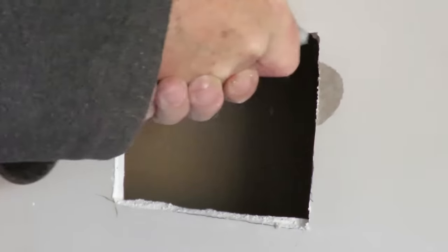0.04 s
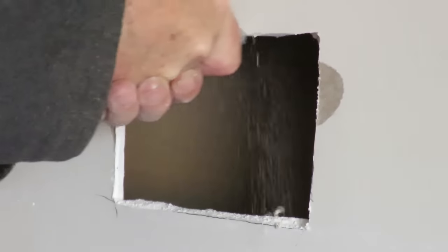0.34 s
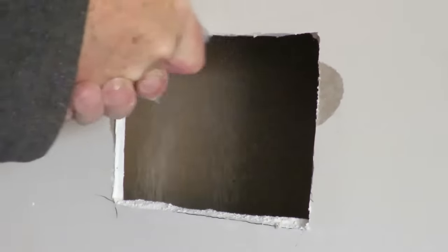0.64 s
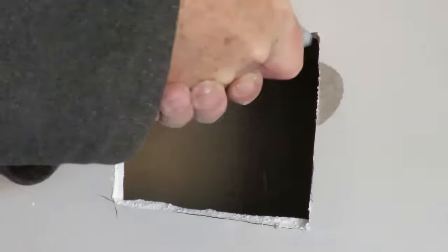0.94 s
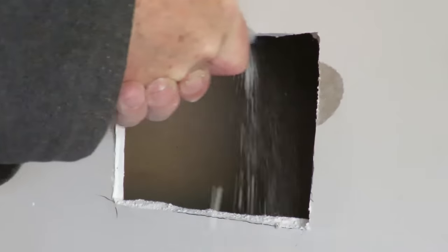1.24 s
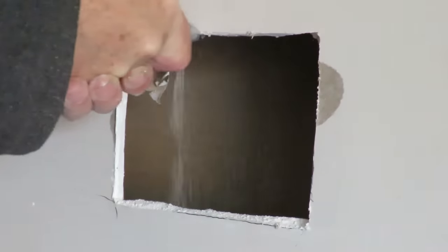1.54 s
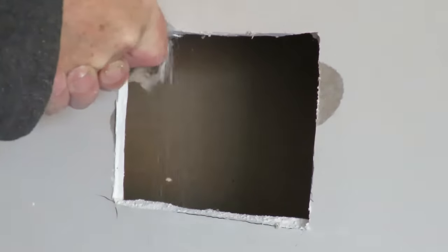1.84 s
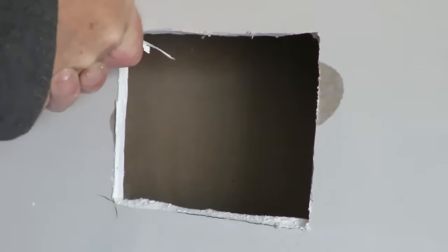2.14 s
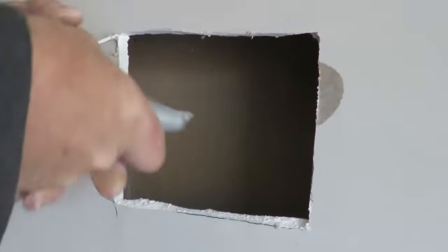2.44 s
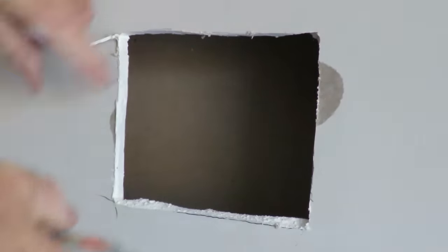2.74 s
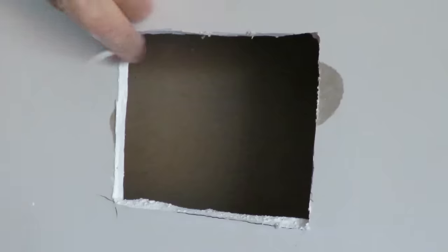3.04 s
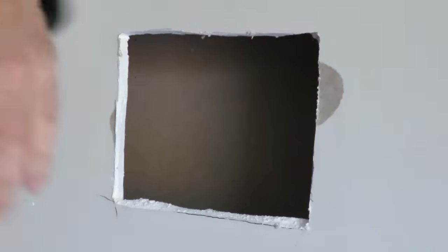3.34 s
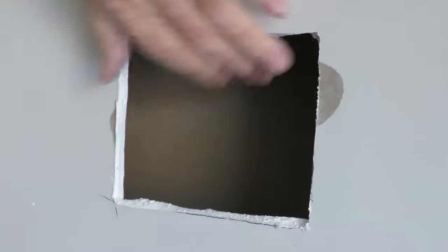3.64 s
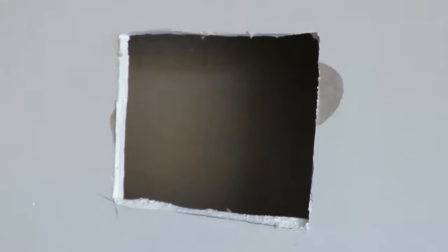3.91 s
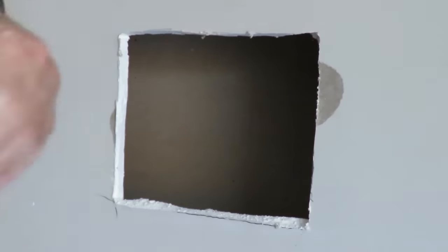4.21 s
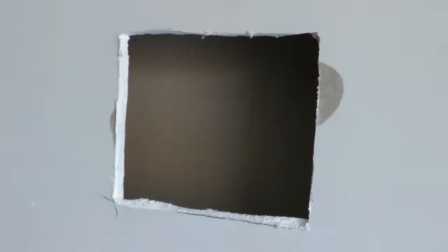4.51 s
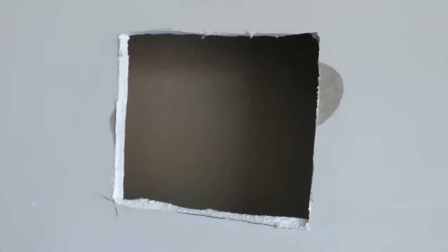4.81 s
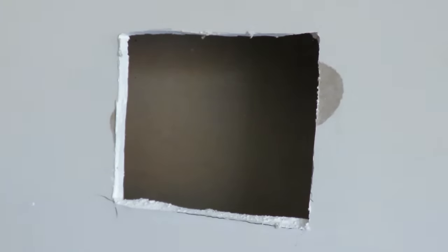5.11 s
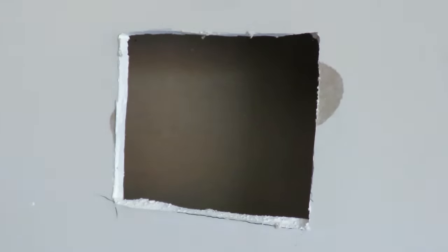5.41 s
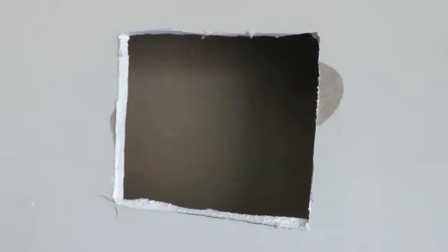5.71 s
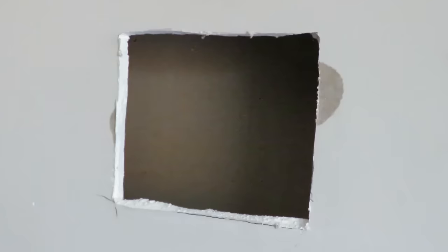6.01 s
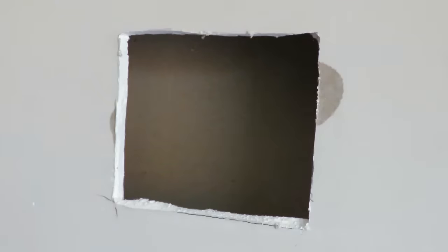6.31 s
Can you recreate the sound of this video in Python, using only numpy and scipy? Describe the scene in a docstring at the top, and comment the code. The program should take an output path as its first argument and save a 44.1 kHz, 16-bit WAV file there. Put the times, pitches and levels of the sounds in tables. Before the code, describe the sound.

Close, uneven scrapes of a blade cutting plasterboard come with crunching crumbs and hollow thumps from the wall. After about two seconds they end in a sharp crack. A couple of brief finger wipes and light bumps follow, then quiet sliding and scuffing, a rattling knock as an object is put down, and a few small taps. The bare room reverberates a little, and a distant machine hums faintly.

```python
"""A utility knife trims the edge of a hole in a plasterboard wall; the last shaving snaps off.
Gypsum crumbles under the short strokes while the blade's stick-slip drums on the hollow wall.
Fingers bump and wipe the edge. Off to the left something slides and is set down with a knock.
The bare room rings, and a distant machine hums faintly."""
import sys
import numpy as np
from scipy import signal
from scipy.fft import rfft, irfft, next_fast_len
from scipy.io import wavfile
from scipy.ndimage import uniform_filter1d, map_coordinates

SR = 44100
rng = np.random.default_rng(int(sys.argv[2]) if len(sys.argv) > 2 else 0)


def file_out(sig):
    """Save sig as 16-bit WAV at sys.argv[1]."""
    # one column per channel
    cols = np.atleast_2d(sig).T
    # limit, then scale
    lim = np.clip(cols, -1, 1)
    pcm = np.round(lim * 32767).astype(np.int16)
    wavfile.write(sys.argv[1], SR, pcm)


N = 280476

ATTACK_S, RELEASE_DB_PER_S = 0.03, 334
JUDDER_SWELL_RATIO, JUDDER_RELEASE_DB_PER_S = 2.14, 258
# Knife strokes, then finger wipes:
# start_s, length_s, rasp_db, swell_db, judder_db, dust_db, ring_hz, ring_db
STROKES = [(-0.009, 0.14, -44.5, 1, -34, -18, 3670, -4.5), (0.11, 0.13, -39.5, 2, -24.5, -17, 3140, -4.5),
           (0.223, 0.13, -33.5, 2.5, -22.5, -20, 3750, -6), (0.394, 0.17, -32.5, 9.5, -28, -18.5, 3600, -7),
           (0.687, 0.24, -39, -6, -32, -18.5, 3700, -7), (1.034, 0.13, -34.5, 8.5, -31.5, -17, 2800, -20),
           (1.233, 0.17, -31.5, 7.5, -28, -19, 3440, -7.5),
           (1.399, 0.15, -35.5, -5.5, -29.5, -21, 3640, -6.5),
           (1.594, 0.093, -39, 3.5, -32.5, -15, 3740, -2.5),
           (1.705, 0.073, -33.5, -2.5, -27.5, -14.5, 3730, -5),
           (1.865, 0.16, -30, 6.5, -26.5, -14, 3710, -3), (2.264, 0.091, -28.5, 2, -26, -19, 3920, -16),
           (2.934, 0.21, -50.5, -8, -40.5, -11, 3740, -3.5), (3.731, 0.036, -42, 6, -30, -6.5, 3580, -22),
           (3.752, 0.057, -29.5, 6, -32.5, -18, 3930, -5)]
# Blade stuck between strokes: start_s, length_s, judder_db
STALLS = [(-0.02, 0.02, -20.5), (0.097, 0.02, -23), (0.946, 0.059, -24.5), (1.165, 0.05, -22),
          (1.82, 0.04, -31)]
def stroke_envelopes():
    """A stroke drives judder, rasp and a share of dust; a stall drives only judder."""
    judder, rasp, dust = np.zeros((3, N))
    for start_s, length_s, rasp_db, swell_db, judder_db, dust_db, _, _ in STROKES:
        bite = push(start_s, length_s, rasp_db, swell_db, ATTACK_S, RELEASE_DB_PER_S)
        rasp = np.maximum(rasp, bite)
        dust = np.maximum(dust, bite * amp(dust_db))
        shake = push(start_s, length_s, judder_db, JUDDER_SWELL_RATIO * swell_db,
                     ATTACK_S, JUDDER_RELEASE_DB_PER_S)
        judder = np.maximum(judder, shake)
    for start_s, length_s, judder_db in STALLS:
        shake = push(start_s, length_s, judder_db, 0, ATTACK_S, JUDDER_RELEASE_DB_PER_S)
        judder = np.maximum(judder, shake)
    return judder, rasp, dust / (rasp + 1e-12)


# Crumbling gypsum spectrum: freq_hz, level_db
RASP_SPECTRUM = [(150, -61), (400, 13.5), (700, 10.5), (1100, 6), (2000, 3.5), (2800, 3), (3500, 7.5),
                 (4100, 3), (4600, -6), (5700, -36.5), (7200, -31.5), (8300, -32), (15500, -64.5)]
# Fine dust spectrum: freq_hz, level_db
DUST_SPECTRUM = [(3000, -13), (6000, 8.5), (8500, 2.5), (10300, 10.5), (12300, 6.5), (13800, -2),
                 (15500, -5)]
def knife_scrape():
    """The blade judders and breaks gypsum in puffs of grains; both shake the wall."""
    judder, rasp, dust_share = stroke_envelopes()
    kicks = stick_slip(rate_hz=200.2, scatter=0.17, spread_db=4)
    breaks = grains(rate_hz=840, spread_db=-1.5)
    puff_pole = np.exp(-1 / (0.0054 * SR))
    puffs = unit(signal.lfilter([1], [1, -puff_pole], np.abs(breaks) + kicks))
    grit = grains(rate_hz=2400, spread_db=0.5) * (2.7 + puffs)
    crumbs = unit(coloured(grit, RASP_SPECTRUM)) * amp(-4.5)
    fine_grit = grains(rate_hz=2200, spread_db=3) * (0.5 + puffs)
    dust = unit(coloured(fine_grit, DUST_SPECTRUM)) * amp(-6)
    sprung = resonant(kicks, [(201, 220, 0)])  # springy grip
    drumming = judder * unit(hollow_wall(sprung)) * amp(-3.5)
    drumming += rasp * unit(hollow_wall(breaks)) * amp(1.43)
    hardness = amp(1.23 * wobble(55))
    cutting = rasp * (crumbs + dust_share * dust) + edge_ring(grit)
    return drumming + hardness * cutting + crunches() + rasp * crumb_crackle()


def stick_slip(rate_hz, scatter, spread_db):
    """The blade catches and lets go in uneven kicks, rms 1."""
    cycles = np.cumsum(rate_hz * np.exp(scatter * wobble(150))) / SR
    slips = np.diff(np.floor(cycles), prepend=0)
    return unit(slips * amp(spread_db * wobble(200)))


# Wall modes: pitch_hz, width_hz, gain_db
WALL_MODES = [(68, 3.1, -27), (91, 14, -6), (125.8, 9.7, 4.5), (151.1, 11.8, 4), (182.3, 38, -4),
              (246.8, 28.2, 1.5), (276.5, 5.6, -3.5), (294.4, 11.6, -2), (346, 12.7, -3.5), (410, 57, -9.5),
              (469, 11, -11), (581, 5.4, -2), (607, 6.3, -2.5), (740.6, 18, -3), (830, 110, -14)]
def hollow_wall(force):
    """The heavy wall answers with low modes and damps the treble."""
    return filtered(resonant(force, WALL_MODES), lambda hz: 1 / (1 + 1j * hz / 1400) ** 3)


EDGE_BAND_HZ = 970
# Cut edge modes: pitch_ratio, width_hz, gain_db
EDGE_MODES = [(.93, 287, -0.5), (1.0, 258, -4.5), (1.07, 260, -8.2)]
def edge_ring(grit):
    """The edge rings higher or lower depending on where a stroke meets it."""
    out = np.zeros(N)
    for start_s, length_s, rasp_db, swell_db, _, _, ring_hz, ring_db in STROKES:
        span = slice(max(round(start_s * SR), 0), round((start_s + length_s + 0.3) * SR))
        modes = [(ring_hz * ratio, width_hz, db) for ratio, width_hz, db in EDGE_MODES]
        ring = resonant(resonant(grit[span], modes), [(ring_hz, EDGE_BAND_HZ, 0)])
        bite = push(start_s, length_s, rasp_db + ring_db, swell_db, ATTACK_S, RELEASE_DB_PER_S)
        out[span] += unit(ring) * bite[span]
    return out


# Lumps breaking: start_s, length_s, level_db, attack_s
CRUNCHES = [(0.123, 0.085, -41.5, 0.013), (0.241, 0.021, -33.5, 0.011), (0.271, 0.041, -40, 0.0073),
            (0.543, 0.0074, -46, 0.003), (0.566, 0.014, -44, 0.006), (0.688, 0.0065, -36, 0.0059),
            (1.126, 0.038, -35, 0.019), (1.179, 0.02, -39, 0.0051), (1.228, 0.01, -41, 0.004),
            (1.258, 0.021, -41, 0.0049), (1.285, 0.031, -34, 0.01), (1.313, 0.053, -39.5, 0.008),
            (1.412, 0.025, -54, 0.0093), (1.621, 0.0083, -41, 0.0044), (1.723, 0.016, -40, 0.0054),
            (1.909, 0.011, -33.5, 0.0067), (1.925, 0.012, -31.5, 0.006), (1.998, 0.024, -33, 0.008),
            (2.355, 0.01, -25.5, 0.0056), (3.798, 0.027, -37, 0.0054)]
# Coarse grain spectrum: freq_hz, level_db
CRUNCH_SPECTRUM = [(300, -28), (1000, 0.5), (2500, 6), (4000, 4), (5200, -2.5), (7000, -15.5), (8500, -18),
                   (10500, -20), (12500, -18), (14000, -26), (15500, -37)]
def crunches():
    """Lumps of gypsum give way in bright clusters of coarse grains."""
    bursts = sum(push(start_s, length_s, db, swell_db=-3.5, attack_s=attack_s, release_db_per_s=900)
                 for start_s, length_s, db, attack_s in CRUNCHES)
    return bursts * unit(coloured(grains(rate_hz=2200, spread_db=2.5), CRUNCH_SPECTRUM))


# Crumb sizes: pitch_hz, width_hz, level_db
CRUMB_BANDS = [(1474, 950, -14), (2460, 1150, -15.5), (3750, 880, -12), (4770, 740, -20.5),
               (5230, 670, -30), (6600, 1600, -28.5), (9900, 1240, -38), (12130, 2000, -35)]
def crumb_crackle():
    """Larger crumbs pop off singly, each size at its own pitch."""
    return sum(unit(band_passed(grains(rate_hz=110, spread_db=4), pitch_hz, width_hz)) * amp(db)
               for pitch_hz, width_hz, db in CRUMB_BANDS)


# Shaving cracks: start_s, level_db
CRACKS = [(2.357, -26), (2.362, -11), (2.3688, -19.5), (2.377, -24)]
# Crack spectrum: freq_hz, level_db
CRACK_SPECTRUM = [(150, -20), (600, -2), (950, 4.5), (1300, -4.5), (1800, 0), (3500, -5.5), (5500, -25),
                  (8000, -20.5), (11000, -19), (13000, -30), (15500, -40)]
# Knife modes: pitch_hz, width_hz, gain_db
KNIFE_MODES = [(920, 72, 0), (1092, 45, 5.5), (1213, 36, 13), (1760, 500, -11)]
def shaving_snap():
    """The shaving breaks in sharp cracks that ring the whole knife."""
    out = np.zeros(N)
    for start_s, level_db in CRACKS:
        crack = coloured(contact(t60_s=0.0095, roughness=0.15), CRACK_SPECTRUM)
        add(out, start_s, crack + resonant(crack, KNIFE_MODES), level_db)
    return out


PATCH_WIDTH_HZ, PATCH_DB = 81, 3.5
# Hand and knife bumps: start_s, level_db, contact_s, pitch_hz
BUMPS = [(0.05, -26.5, 0.00054, 151), (0.332, -19.5, 0.00016, 162), (0.345, -16, 0.00033, 236),
         (0.537, -14, 0.00022, 186), (0.569, -14, 0.000055, 129), (0.694, -16.5, 0.000022, 282),
         (1.011, -21.5, 0.000033, 296), (1.361, -13.5, 0.0001, 232), (1.43, -16.5, 0.000045, 145),
         (2.051, -18.5, 0.0011, 140), (2.084, -18.5, 0.0007, 136), (2.296, -14, 0.000068, 297),
         (2.953, -24, 0.00027, 278), (2.967, -20.5, 0.0004, 293), (2.994, -24.5, 0.00084, 144),
         (3.102, -27, 0.00015, 386), (3.736, -17.5, 0.00064, 125), (3.809, -21, 0.00012, 246),
         (4.084, -35, 0.000032, 680), (4.511, -30.5, 0.000064, 387), (4.93, -34, 0.00003, 636),
         (6.062, -28.5, 0.00013, 280), (6.089, -27.5, 0.00061, 258)]
def wall_bumps():
    """Longer contact favours lower wall modes; the pushed patch adds its own pitch."""
    out, t = np.zeros(N), np.arange(SR // 2) / SR
    for start_s, level_db, contact_s, pitch_hz in BUMPS:
        thud = hollow_wall(t * np.exp(-t / contact_s))
        patch = resonant(thud, [(pitch_hz, PATCH_WIDTH_HZ, PATCH_DB)])
        add(out, start_s, thud + patch, level_db)
    return out


CHIP_HZ, CHIP_WIDTH_HZ = 10000, 3200
# Blade, crumb and tool ticks: start_s, level_db, ring_hz, chip_db
TICKS = [(0.032, -29, 3330, -5), (0.039, -39, 3420, -8), (0.695, -27, 860, -18), (0.697, -27, 1640, -25),
         (1.011, -33.5, 3730, -9), (1.876, -26.5, 3620, -4), (2.032, -19.5, 3650, -20),
         (2.271, -32.5, 3700, -1), (2.463, -38, 3700, 7), (3.096, -32, 3400, -1.5), (3.438, -47.5, 2080, 0),
         (3.72, -40, 2670, 1), (3.729, -37, 3700, 8), (4.072, -35.5, 2850, -25), (4.08, -30, 2800, -29),
         (4.094, -34, 2800, -25), (4.928, -44.5, 1900, -14), (5.696, -24.5, 3680, -3.5),
         (6.005, -29, 2900, -13), (6.011, -30.5, 2970, -5.5)]
def ticks():
    """Small hard contacts ring briefly; flying chips add thin treble."""
    out = np.zeros(N)
    tap_spectrum = [(200, 19.5), (1000, 12), (4000, 2), (7000, -16), (12000, -15), (15500, -48)]
    for start_s, level_db, ring_hz, chip_db in TICKS:
        hit = contact(t60_s=0.048, roughness=0.14)
        tap = coloured(hit, tap_spectrum)
        ring = resonant(tap, [(ring_hz, ring_hz / 3, 5)])
        chip = band_passed(hit, CHIP_HZ, CHIP_WIDTH_HZ) * amp(chip_db)
        add(out, start_s, tap + ring + chip, level_db)
    return out


# Landing and rebounds: start_s, ring_db, clack_db, low_cut_hz, ping_hz, ping_db
KNOCKS = [(5.6886, -3, -9, 90, 3380, -17.5), (5.743, -27.5, 4.5, 450, 780, -25),
          (5.792, -34, 11, 690, 4080, -31), (5.798, -34.5, 7.5, 950, 1350, -21),
          (5.803, -34, 7.5, 990, 1700, -34), (5.811, -36, 3, 795, 1290, -27)]
# Struck board modes and the room's low boom (last two rows): pitch_hz, level_db, t60_s
KNOCK_MODES = [(263.5, -3.5, 0.17), (390, 6.5, 0.017), (489, -9, 0.096), (583, -18, 0.18),
               (750, -34, 0.057), (1008, -25, 0.09), (1780, -21, 0.036), (101, -19.5, 0.51),
               (146, -23, 0.35)]
# Edge clack spectrum: freq_hz, level_db
CLACK_SPECTRUM = [(60, -27), (150, 15), (400, 12.5), (800, 5), (1300, -0.5), (1900, -6.5), (2600, -13),
                  (3800, -25), (5500, -33), (8000, -41), (11000, -49), (15500, -84)]
def knocks():
    """An object lands, ringing a board and the room's low modes; rebounds clack more thinly."""
    body, clacks = np.zeros((2, N))
    t = np.arange(SR // 2) / SR
    ring = sum((-1) ** k * amp(db - 60 * t / t60_s) * np.sin(2 * np.pi * hz * t)
               for k, (hz, db, t60_s) in enumerate(KNOCK_MODES))
    ring = high_passed(ring, cutoff_hz=147)  # the board radiates little bass
    for start_s, ring_db, clack_db, low_cut_hz, _, _ in KNOCKS:
        add(body, start_s, ring, ring_db)
        clack = coloured(contact(t60_s=0.076, roughness=0.34), CLACK_SPECTRUM)
        add(clacks, start_s, high_passed(clack, low_cut_hz), ring_db + clack_db)
    thud = room(body, NEAR_SPREAD, wet_db=-6.5, early_db=-15) * amp(3.5)
    return thud + room(clacks, NEAR_SPREAD, wet_db=-2.5, early_db=-14) * amp(4.5)


PING_ATTACK_S, PING_T60_S = 0.00065, 0.0079
def knock_pings():
    """Each knock's hard contact point gives a short crack around one pitch."""
    out, t = np.zeros(N), np.arange(SR // 2) / SR
    envelope = (1 - np.exp(-t / PING_ATTACK_S)) * amp(-60 * t / PING_T60_S)
    for start_s, _, _, _, hz, level_db in KNOCKS:
        tone = envelope * np.sin(2 * np.pi * hz * t)
        spectrum = [(500, -20), (hz, 0), (1.9 * hz, -6), (2 * hz, -22), (12000, -30), (15500, -54)]
        crack = coloured(contact(t60_s=0.011, roughness=0.92), spectrum)
        add(out, start_s, unit(tone) + unit(crack) * amp(-8.5), level_db)
    return out


# Sliding moves: start_s, length_s, level_db, swell_db
SLIDES = [(2.42, 0.53, -51, -8), (3.964, 0.083, -48, 3), (4.29, 0.21, -43.5, -7), (4.45, 0.2, -52, 1),
          (4.812, 0.095, -52, -1), (4.908, 0.089, -43.5, 6), (5.017, 0.39, -43, 8.5),
          (5.404, 0.26, -42.5, -6.5), (6.014, 0.21, -44, -10), (6.2, 0.18, -52, 7)]
# Friction spectrum: freq_hz, level_db
SLIDE_SPECTRUM = [(120, -64), (200, -44), (231, -27), (298, 1), (376, -3), (636, -11.5), (946, -6.5),
                  (1170, -9), (1690, -7.5), (4640, -18.5), (7970, -34.5), (12300, -29.5), (15000, -56)]
# Scuffs and squeaks: start_s, length_s, level_db, pitch_hz, half_width_hz
SCUFFS = [(2.717, 0.2, -56, 1470, 328), (3.1, 0.039, -55, 3400, 1780), (4.066, 0.03, -62, 2930, 1160),
          (4.292, 0.087, -42, 2970, 606), (4.353, 0.064, -39.5, 2700, 660), (5.168, 0.1, -59, 4940, 1400),
          (5.41, 0.2, -56.5, 4350, 1000), (5.279, 0.1, -43.5, 2860, 684), (5.335, 0.07, -41, 1910, 404),
          (6.097, 0.044, -49.5, 4270, 384), (6.11, 0.047, -40.5, 1645, 158)]
def sliding():
    """A sliding object sheds fine friction noise; scuffs catch a resonance."""
    moves = np.max([push(*move, attack_s=0.055, release_db_per_s=185) for move in SLIDES], axis=0)
    envelope = moves * amp(0.47 * wobble(22) - 2.5)
    out = envelope * unit(coloured(grains(rate_hz=3900, spread_db=-1), SLIDE_SPECTRUM))
    friction = grains(rate_hz=3600, spread_db=5.5)
    for start_s, length_s, level_db, pitch_hz, half_width_hz in SCUFFS:
        span = slice(round(start_s * SR), round((start_s + length_s) * SR))
        rub = unit(band_passed(friction[span], pitch_hz, 2 * half_width_hz))
        out[span] += amp(level_db) * rub * np.hanning(len(rub)) ** 0.25
    return out


# Stereo spread of near sources: freq_hz, side_re_mid_db
NEAR_SPREAD = [(60, -28), (130, -27), (260, -14), (2000, -12.5), (4400, -11.5), (6400, 0.5), (9000, -5),
               (12500, -2)]
# Stereo spread of far sources: freq_hz, side_re_mid_db
FAR_SPREAD = [(60, -12), (120, -5), (220, 5), (500, 2.5), (1300, -4.5), (4000, -4.5), (12000, 1)]
# Room decay: freq_hz, t60_s
ROOM_DECAY = [(100, 0.5), (300, 0.53), (1000, 0.74), (3500, 0.73), (7000, 0.59), (14000, 0.26)]
def room(x, spread, wet_db, early_db):
    """Direct sound, early reflections off near walls and the bare room's tail."""
    hz, t, spectra = signal.stft(rng.standard_normal((2, SR)), SR, nperseg=256)
    decay = amp(-60 * t / along(ROOM_DECAY, hz)[:, None])
    build_up = 1 - np.exp(-t / 0.0068)
    tail = signal.istft(spectra * decay * build_up, SR, nperseg=256)[1]
    t = np.arange(tail.shape[1]) / SR
    early = rng.standard_normal(tail.shape) * (t > 0.002) * amp(-60 * t / 0.11)
    tail *= amp(wet_db) / np.linalg.norm(tail[0])
    early *= amp(early_db) / np.linalg.norm(early[0])
    reflections = signal.fftconvolve(x[None], diffuse(tail + early, spread), axes=1)[:, :N]
    return (x + reflections) / np.sqrt(1 + amp(wet_db) ** 2 + amp(early_db) ** 2)


def travelling(x, places, step_s, wet_db, early_db):
    """The room answers each place of the blade along the edge differently."""
    place = np.floor(np.arange(N) / SR / step_s) % places
    fades = (uniform_filter1d(1.0 * (place == k), size=600) for k in range(places))
    return sum(room(x * fade, NEAR_SPREAD, wet_db, early_db) for fade in fades)


DRONE_HZ = 73.8
# Machine hum bands: pitch_hz, width_hz, level_db
HUM_BANDS = [(146, 24, -64.5), (1027, 10, -63.5), (1070, 89, -67.5), (473, 45, -66.5)]
# Still air spectrum: freq_hz, level_db
AIR_SPECTRUM = [(20, 16), (45, 12.5), (80, -4), (115, -8), (200, 3.5), (450, 4), (650, -0.5), (1400, -5.5),
                (2100, -8), (5000, -19), (12500, -28), (15000, -41)]
def hum_and_air():
    """A distant machine's wavering hum over still air."""
    air = noise(lambda hz: amp(along(AIR_SPECTRUM, hz))) * amp(-53.5)
    phase = 2 * np.pi * DRONE_HZ * np.arange(N) / SR + 0.52 * wobble(8.3)
    drone = unit(np.sin(phase) * amp(0.91 * wobble(6.5))) * amp(-55.5)
    hum = sum(amp(db) * noise(lambda hz: 1 / (1 + (2 * (hz - pitch_hz) / width_hz) ** 2))
              for pitch_hz, width_hz, db in HUM_BANDS)
    return drone + diffuse(air + hum, FAR_SPREAD)


def push(start_s, length_s, level_db, swell_db, attack_s, release_db_per_s):
    """Gain of one movement: attack, sloping hold, release."""
    t = np.arange(N) / SR - start_s
    hold_db = level_db + swell_db * (np.clip(t / length_s, 0, 1) - 0.5)
    release_db = release_db_per_s * np.clip(t - length_s, 0, 1)
    return np.clip(t / attack_s, 0, 1) * amp(hold_db - release_db)


def contact(t60_s, roughness):
    """One sharp kick, then decaying grit."""
    t = np.arange(SR // 2) / SR
    return (t == 0) + roughness * rng.standard_normal(len(t)) * amp(-60 * t / t60_s)


def grains(rate_hz, spread_db):
    """Random impulses of uneven size, rms 1."""
    impulses = (rng.random(N) < rate_hz / SR) * rng.choice([-1, 1], N)
    return unit(impulses * amp(spread_db * np.clip(rng.standard_normal(N), -2, 2)))


def noise(response):
    """Two unrelated filtered noises, rms 1."""
    return unit(filtered(rng.standard_normal((2, N)), response))


def wobble(rate_hz):
    """Smooth curve through random knots."""
    knots = rng.standard_normal(int(N * rate_hz / SR) + 4)
    return map_coordinates(knots, [np.arange(N) * rate_hz / SR])


def amp(db):
    return 10 ** (np.asarray(db) / 20)


def unit(x):
    return x / np.sqrt(np.mean(x ** 2) + 1e-20)


def along(points, hz):
    """Interpolate (freq_hz, value) points on a log axis."""
    freq_hz, values = np.transpose(points)
    return np.interp(np.log(hz + 1), np.log(freq_hz + 1), values)


def add(track, start_s, x, peak_db):
    """Mix x into the track."""
    part = track[max(round(start_s * SR), 0):][:len(x)]
    part += (amp(peak_db) * x / np.abs(x).max())[:len(part)]


def filtered(x, response):
    """Apply a complex frequency response."""
    length = x.shape[-1]
    size = next_fast_len(length + SR // 2)
    return irfft(rfft(x, size) * response(np.fft.rfftfreq(size, 1 / SR)), size)[..., :length]


def coloured(x, spectrum):
    """Minimum-phase filter from (freq_hz, level_db) points."""
    size = 4096
    cepstrum = irfft(np.log(amp(along(spectrum, np.fft.rfftfreq(size, 1 / SR)))))
    fold = np.r_[1, np.full(size // 2 - 1, 2), np.zeros(size // 2)]
    impulse_response = irfft(np.exp(rfft(cepstrum * fold)))
    return signal.fftconvolve(x, impulse_response)[:len(x)]


def resonant(x, modes):
    """Parallel (pitch_hz, width_hz, gain_db) resonances."""
    return filtered(x, lambda hz: sum(
        amp(db) * 1j * hz * width / (pitch ** 2 - hz ** 2 + 1j * hz * width)
        for pitch, width, db in modes))


def band_passed(x, pitch_hz, width_hz):
    """Two equal resonances in series."""
    mode = [(pitch_hz, width_hz, 0)]
    return resonant(resonant(x, mode), mode)


def high_passed(x, cutoff_hz, order=2):
    return signal.sosfilt(signal.butter(order, cutoff_hz, "high", fs=SR, output="sos"), x)


def diffuse(pair, spread):
    """Two unrelated signals as mid and side, mixed to left and right."""
    side = filtered(pair[1], lambda hz: amp(along(spread, hz)))
    return np.array([pair[0] + side, pair[0] - side])


def from_left(pair, lead_s):
    """Sound reaches the left channel first."""
    return filtered(pair, lambda hz: np.exp(1j * np.pi * hz * lead_s * np.array([[1], [-1]])))


def scene():
    """Work at the wall, the object to the left and the hum, in one room."""
    thuds = room(wall_bumps(), NEAR_SPREAD, wet_db=-5, early_db=-7) * amp(1.5)
    scrape = travelling(knife_scrape(), places=4, step_s=0.14, wet_db=-5.5, early_db=-3.5)
    taps = room(ticks(), NEAR_SPREAD, wet_db=-5, early_db=-2.5) * amp(8)
    snap = room(shaving_snap(), NEAR_SPREAD, wet_db=-8, early_db=-3) * amp(8)
    at_wall = (scrape + thuds + taps + snap) * amp([[0.25], [-0.25]])
    aside = knocks() + room(sliding(), FAR_SPREAD, wet_db=-9, early_db=-11.5)
    aside += room(knock_pings(), NEAR_SPREAD, wet_db=-10, early_db=-13)
    aside = from_left(aside, lead_s=0.000025) * amp([[0.55], [-0.55]])
    return at_wall + aside + hum_and_air()


def record(dry):
    """Roll off the deep bass and cut the top treble."""
    return filtered(high_passed(dry, cutoff_hz=55, order=3), lambda hz: hz < 15750)


dry = scene()
out = record(dry)
file_out(out)
```